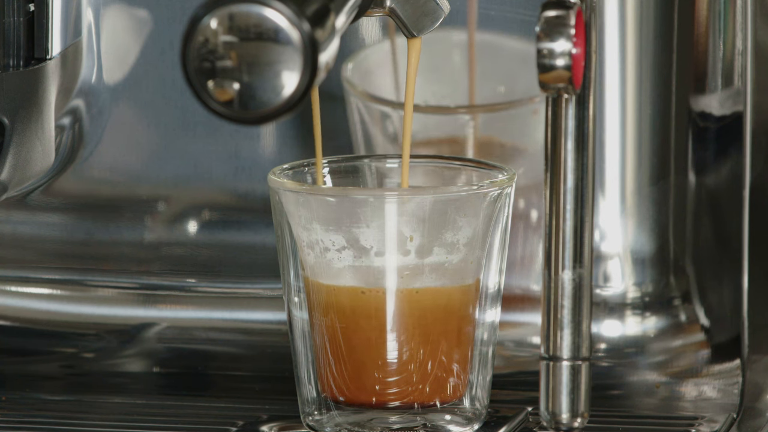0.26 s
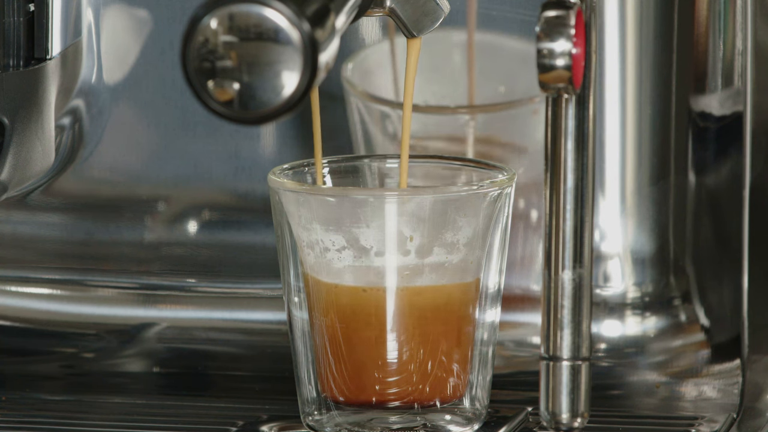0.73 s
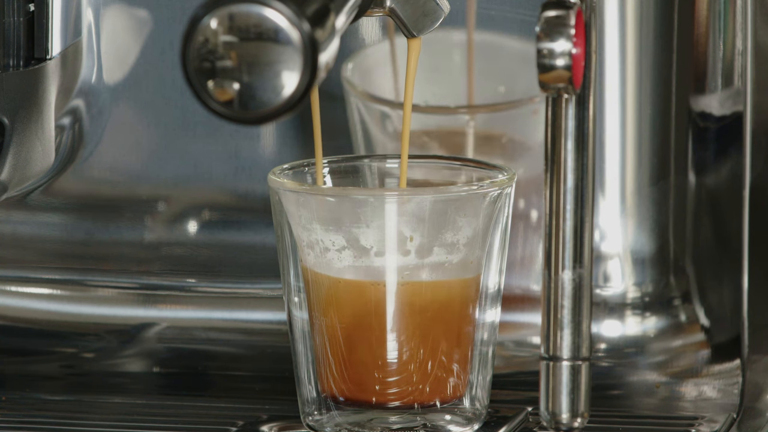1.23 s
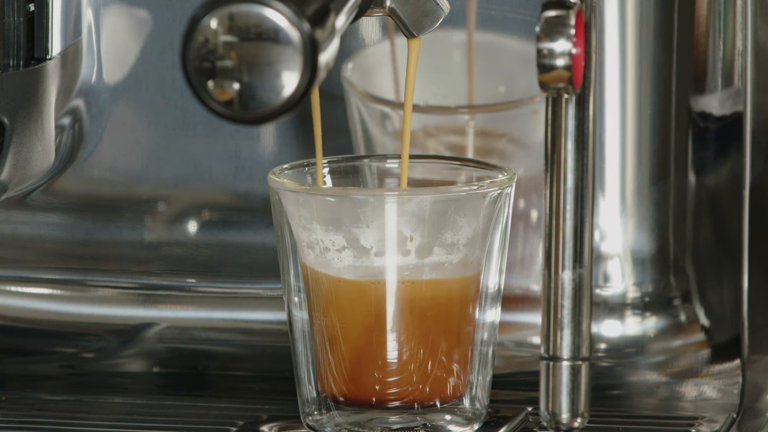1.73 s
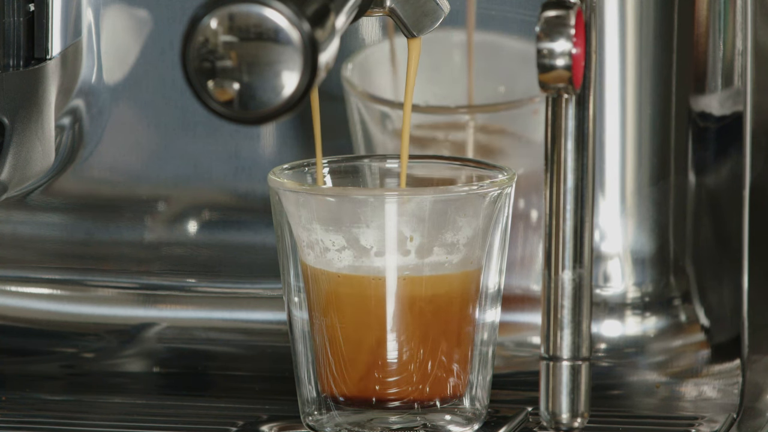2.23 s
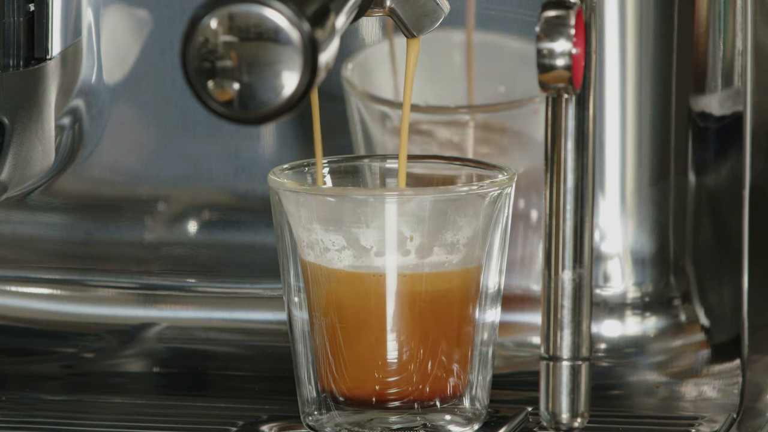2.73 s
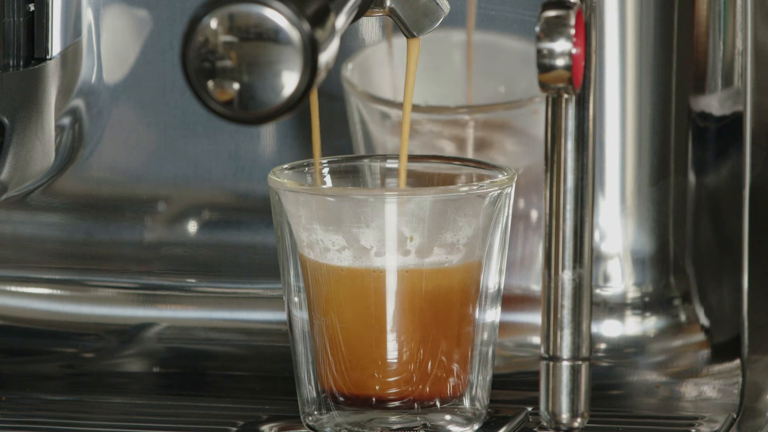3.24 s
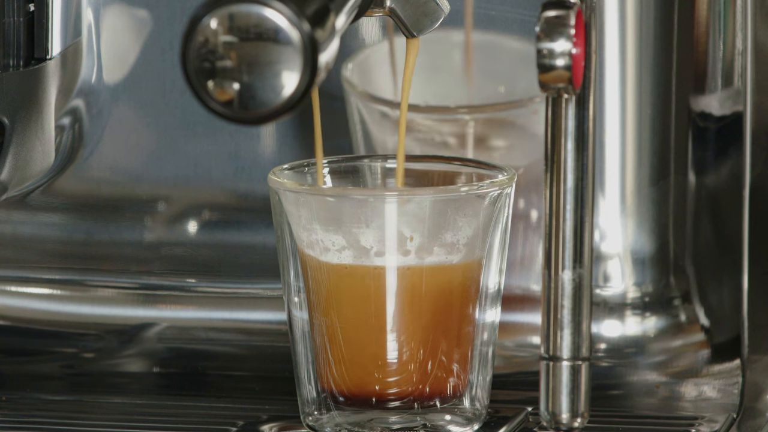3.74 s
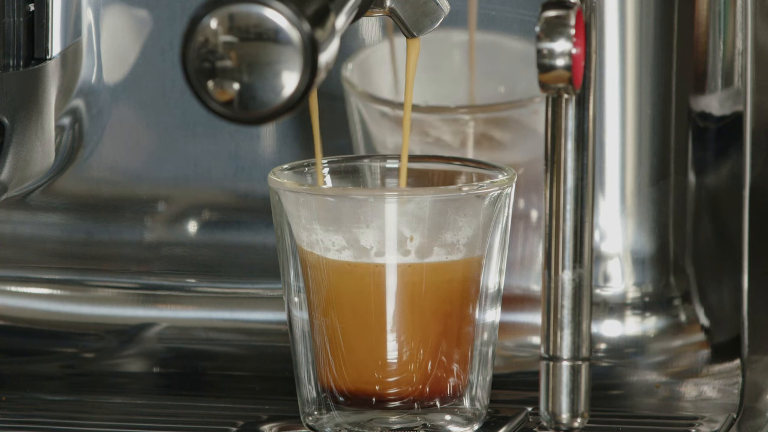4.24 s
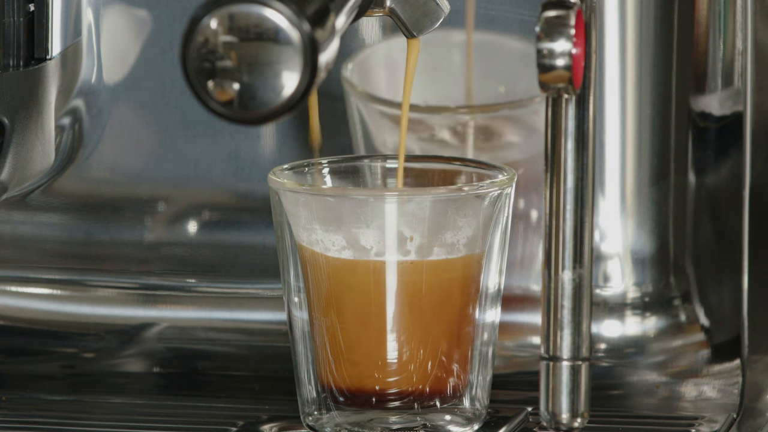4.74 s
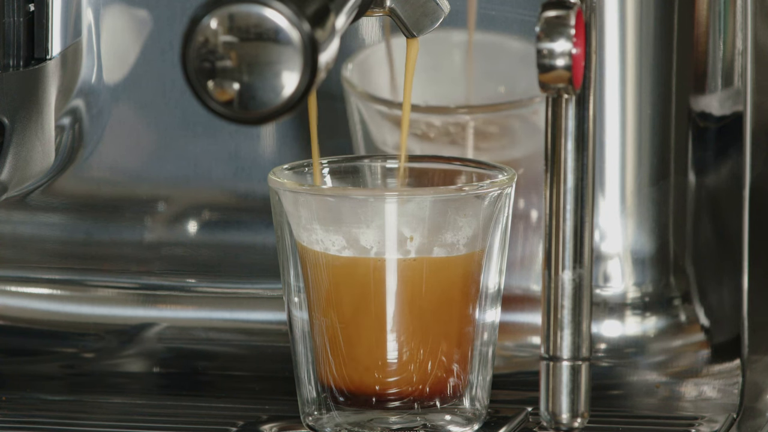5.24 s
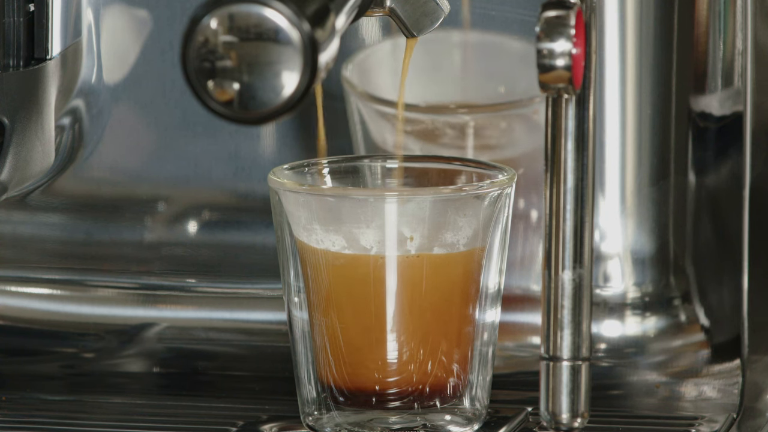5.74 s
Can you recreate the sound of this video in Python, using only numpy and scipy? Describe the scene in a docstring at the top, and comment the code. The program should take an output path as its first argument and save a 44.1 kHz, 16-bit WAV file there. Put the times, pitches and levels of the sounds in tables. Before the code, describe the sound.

Close to a coffee machine in a quiet room, a mains-driven pump buzzes in quick uneven surges over pulsing water noise and faint chattering metal. It then settles to an even, slightly whinier drone. Near the end the power drops, the pump knocks to a halt, a valve releases a short burst of water and air, and sparse droplets spit into near silence.

```python
"""The vibratory pump of an espresso machine hums on mains current while coffee runs into a glass.
The hum is a stack of mains harmonics; whine, rasp, rattle and rushing water follow the same strokes.
Its pressure surges about five times a second, then settles. The pump cuts off with a clunk built of
decaying modes, the valve gushes and spits shaped noise and bubbles, and a quiet room is left."""
import sys
import numpy as np
from scipy import signal
from scipy.fft import rfft, irfft
from scipy.io import wavfile

SR = 44100
rng = np.random.default_rng(int(sys.argv[2]) if len(sys.argv) > 2 else 0)


def store_pcm(level_fs):
    """Save levels as 16-bit WAV."""
    pcm = np.round(np.clip(level_fs, -1, 1) * 32767).astype(np.int16)
    wavfile.write(sys.argv[1], SR, np.atleast_2d(pcm).T)


N = 263277
T = np.arange(N) / SR  # s

MAINS_HZ = 60.001
SETTLE, STOP = 3.216, 5.068  # the pressure steadies, the pump cuts off (s)
RUN_DOWN = .13  # t60 of the pump's sound once the power is off (s)
EDGE_HZ = 15480  # upper band limit


def amp(db):
    """Decibels to gain."""
    return 10 ** (np.asarray(db) / 20)


def evened(x):
    """Scales to rms 1."""
    return x / np.sqrt(np.mean(x ** 2) + 1e-30)


def read(points, hz):
    """Reads a spectrum on a log-frequency axis."""
    f, value = np.transpose(points)
    return np.interp(np.log(hz + 1), np.log(f + 1), value)


def add(mix, s, sound):
    """Mixes a sound in at time s."""
    part = mix[round(s * SR):][:len(sound)]
    part += sound[:len(part)]


def colour(x, spectrum):
    """Gives a white signal of rms 1 a spectrum in dB per Hz."""
    gain = amp(read(spectrum, np.fft.rfftfreq(N, 1 / SR)))
    return irfft(rfft(x) * gain, N) * np.sqrt(SR / 2)


def drift(rate_hz):
    """Slow chance of rms 1."""
    hz = np.fft.rfftfreq(N, 1 / SR)
    return evened(irfft(rfft(rng.standard_normal(N)) * np.exp(-(hz / rate_hz) ** 2), N))


def resonate(x, hz, width):
    """A fixed resonance of gain 1 at its centre."""
    r = np.exp(-np.pi * width / SR)
    pole = r * np.exp(2j * np.pi * hz / SR)
    return 2 * signal.lfilter([1 - r], [1, -pole], x).real


def band(count, hz, width):
    """Noise of rms 1 in a bell-shaped band."""
    f = np.fft.rfftfreq(count, 1 / SR)
    bell = .5 ** (2 * ((f - hz) / width) ** 2)
    return evened(irfft(rfft(rng.standard_normal(count)) * bell, count))


def fade(t, t60):
    """Exponential decay from t = 0, by 60 dB in t60 seconds."""
    return np.exp(-np.log(1000) * np.maximum(t, 0) / t60)


def swell(s, length):
    """A bell-shaped rise and fall around time s, with its length taken at half height."""
    return .5 ** ((2 * (T - s) / length) ** 2)


def drive(lag_ms=0.16, ease=0.21, unequal=0.083):
    """The pump's pressure (about 1 at the top of a surge), how settled it is (0-1), its count of strokes."""
    # The pace of the surges, about five a second. Each row: time in seconds, surges gone by.
    pace = [(-.06, -0.5), (.15, 0), (.53, 2), (1.16, 5), (1.57, 7.5), (1.95, 9), (2.73, 13), (3.17, 15),
            (3.6, 16)]
    surge_s, shortens_s_per_s = 0.083, .012  # length at the start, and how fast the surges grow crisper
    steady_pressure = .3  # where the pressure rests once settled, as a share of a surge

    beat = np.interp(T, *np.transpose(pace))
    from_top_s = (beat - np.round(beat)) / np.maximum(np.gradient(beat, T), 1)
    length = np.maximum(surge_s - shortens_s_per_s * T, 1 / MAINS_HZ)
    surge = .5 ** ((2 * from_top_s / length) ** 2) * (1 + unequal * drift(1.3))

    settled = np.clip((T - SETTLE) / ease + .5, 0, 1)
    pressure = surge + (steady_pressure - surge) * settled
    # the piston lags a little whenever the pressure rises
    strokes = MAINS_HZ * (T - lag_ms / 1000 * pressure)
    return pressure, settled, strokes


def hum(pressure, settled, strokes, level_db=-48.5, flutter=0.078, calm_flutter=0.05, flutter_hz=14,
        firm_db=-11, swing_turns=0.16, swing_db=8, calm_db=-1.5, calm_above_hz=700):
    """Mains harmonics shift with the pressure; weak ones flutter most, upper ones soften once it settles."""
    # The lines of the hum. Each row: multiple of the mains, level in dB relative to level_db.
    lines = [(1, -19), (2, -4.5), (3, -31.5), (4, -21), (5, -20.5), (6, -15.5), (7, -12.5), (8, 0.5),
             (9, -24), (10, -18.5), (11, -27.5), (12, -36.5), (13, -29), (14, -28.5), (15, -36.5),
             (16, -43), (17, -34), (18, -32), (19, -27), (20, -35), (21, -39), (22, -29.5), (23, -41),
             (24, -34.5), (25, -36), (26, -41.5)]
    # The lines that answer the pressure. Each row: multiple of the mains, gain in dB as the pressure reaches 1.
    answers = [(1, 3.5), (2, 2), (3, 10.5), (4, 2), (5, -12.5), (6, -3.5), (7, 0), (8, -2), (10, -4.5),
               (13, 13.5), (14, -15.5), (16, 7.5), (18, 6.5), (22, 3), (24, -4)]
    swings = {round(order): db for order, db in answers}

    out = np.zeros(N)
    unrest = flutter + (calm_flutter - flutter) * settled
    for order, db in lines:
        order = round(order)
        swing = swings.get(order, 0)
        soften = calm_db * (settled - .5) * (order * MAINS_HZ > calm_above_hz)
        level = evened(1 + (amp(swing) - 1) * pressure) * amp(db + soften)
        shake = unrest / (1 + amp(db - firm_db))
        # lines that change most in level also bend most in pitch: flat as a surge comes, sharp as it goes
        bend = swing_turns * np.tanh((swing / swing_db) ** 2) * pressure
        turns = order * strokes - bend + rng.random()
        fluttering_level = level * (1 + shake * drift(flutter_hz))
        out += fluttering_level * np.cos(2 * np.pi * turns + shake * drift(flutter_hz))
    return amp(level_db) * np.sqrt(2) * out


def uneven(pressure, settled, strokes, count=45, wander=.55, calm_wander=1.0, wander_hz=9, weave_turns=.3):
    """Strong and weak strokes alternate: lines halfway between harmonics, woven by each surge."""
    # Lines between the main ones. Each row: frequency in Hz, rms level of a line in dB.
    between = [(30, -86), (150, -84), (270, -76.5), (330, -73), (450, -79.5), (510, -70), (630, -87.5),
               (750, -84.5), (930, -95), (1400, -91.5), (2500, -113.5), (4000, -106)]
    out = np.zeros(N)
    looseness = wander + (calm_wander - wander) * settled  # radians
    for order in np.arange(count) + .5:
        turns = order * strokes - weave_turns * pressure + rng.random()
        line = np.cos(2 * np.pi * turns + looseness * drift(wander_hz))
        out += amp(read(between, order * MAINS_HZ)) * line
    return np.sqrt(2) * out


def whine(settled, strokes, settled_db=2.0, strike=.17, flutter=0.11, flutter_hz=14):
    """A thin metallic whine from the casing, in step with the piston's strike; it comes forward later."""
    # High harmonics that the casing singles out. Each row: multiple of the mains, dB before the pump settles.
    high_lines = [(29, -88.5), (36, -92), (42, -88.5), (43, -90)]
    out = np.zeros(N)
    for order, db in high_lines:
        line = np.cos(2 * np.pi * round(order) * (strokes - strike))
        out += amp(db) * (1 + flutter * drift(flutter_hz)) * line
    return np.sqrt(2) * out * amp(settled_db * settled)


def buzz(settled, strokes, ring=0.026, scatter_db=1.3, surging_db=-2.0):
    """Each stroke strikes the casing, which smears the blow into a short rasp: a comb of fine lines."""
    # Tone of the struck casing. Each row: frequency in Hz, dB per Hz before the cut on return.
    casing = [(1450, -140), (1650, -112), (2000, -111), (2330, -111), (2430, -119), (2630, -110),
              (2870, -110), (3150, -125), (3450, -122), (3720, -112), (4000, -123), (5700, -119),
              (7000, -130), (15000, -148)]
    t = T[:round(SR / MAINS_HZ)]
    burst = rng.standard_normal(len(t)) * fade(t, ring)
    # keep only the phases, so the rasp itself has a flat spectrum
    rasp = irfft(np.exp(1j * np.angle(rfft(burst))), len(t))
    blows = np.diff(np.floor(strokes), prepend=0).clip(0, 1) * amp(scatter_db * rng.standard_normal(N))
    rung = signal.oaconvolve(blows, rasp)[:N]
    # cut twice over while surging, once when settled
    return colour(evened(rung), casing) * amp(surging_db * (2.0 - settled))


def rattle(strokes, level_db=-87, per_s=1100, spread_db=4.5, ring=0.013, after_stroke=0.3):
    """Loose fittings chatter, mostly just after each stroke, now and then with a sharper tick."""
    # Thin metal parts that the strokes shake. Each row: frequency in Hz, width in Hz, relative level in dB.
    fittings = [(2530, 220, 5), (2640, 150, -2.5), (3700, 250, 4), (4540, 270, -4.5), (5770, 700, -12),
                (7790, 200, -1), (8800, 170, 0)]
    # The sharpest ticks. Each row: start in seconds, peak level in dB.
    ticks = [(0.958, -64), (1.119, -69), (1.635, -68), (3.159, -66), (3.253, -65), (3.619, -68),
             (3.928, -62)]

    def metal(x):
        """The fittings ring side by side."""
        return sum(amp(db) * resonate(x, hz, width) for hz, width, db in fittings)

    chance = per_s / SR * np.exp(-(strokes % 1) / after_stroke)  # per sample
    force = amp(spread_db * np.minimum(rng.exponential(1, N), 3))
    taps = (rng.random(N) < chance) * force * rng.choice([-1, 1], N)
    out = amp(level_db) * evened(metal(taps))
    t = T[:SR // 10]
    for s, db in ticks:
        tick = metal(rng.standard_normal(len(t)) * fade(t, ring))
        add(out, s, amp(db) * tick / abs(tick).max())
    return out


def rush(settled, strokes, pulse_db=3, surging_db=5, swirl_db=1, level_db=-2.0, churn_hz=2600):
    """Water is pushed in spurts, one a stroke; its lower band churns more until the pressure settles."""
    # Water rushing through the pump. Each row: frequency in Hz, dB per Hz before level_db and churn.
    water_tone = [(30, -120), (62, -91), (100, -99), (210, -97), (300, -97), (490, -97), (700, -106),
                  (1100, -108), (1700, -116), (2700, -118), (3200, -126), (4600, -123), (7000, -128),
                  (15000, -138)]
    spurts = amp(pulse_db * np.cos(2 * np.pi * (strokes - .2)) + swirl_db * drift(9.2))
    flow = amp(level_db) * colour(evened(rng.standard_normal(N) * spurts), water_tone)
    lowpass = signal.butter(2, churn_hz, fs=SR, output="sos")
    churn = signal.sosfiltfilt(lowpass, flow)
    return flow + churn * (amp(surging_db) - 1) * (1 - settled)


def clunk(rise=0.0046, thud_hz=620, thud_width_hz=520, thud_t60=0.13, rough=0.44, rough_hz=70):
    """The piston halts, the frame thuds and rings, and a low, rough note sags away."""
    # Knocks as the pump stops and the valve seats.
    # Each row: start in seconds, level in dB, pitch in Hz, t60 in seconds, dull thud beside the ring in dB.
    knocks = [(5.065, -47, 548, 0.056, -16), (5.181, -64.5, 745, 0.085, 0), (5.186, -71, 604, 0.08, -4)]
    # The frame that rings with a knock. Each row: factor on the knock's pitch, relative level in dB.
    frame = [(1, 8.5), (0.64, -0.5), (4, -22), (2.8, -16)]
    # The low note as the pressure falls. Each row: time in seconds, pitch in Hz, level in dB.
    sag = [(5.072, 135, -50), (5.094, 226, -54), (5.123, 227, -55), (5.145, 215, -66), (5.168, 172, -63.5),
           (5.21, 80, -72)]

    out = np.zeros(N)
    t = T[:SR // 3]
    for s, db, hz, t60, thud_db in knocks:
        modes = sum(amp(mode_db) * np.sin(2 * np.pi * hz * factor * t) for factor, mode_db in frame)
        ring = modes * fade(t - rise, t60)
        thud = amp(thud_db) * band(len(t), thud_hz, thud_width_hz) * fade(t - rise, thud_t60)
        add(out, s, amp(db) * (ring + thud) * np.minimum(t / rise, 1))

    s, hz, db = np.transpose(sag)
    phase = 2 * np.pi * np.cumsum(np.interp(T, s, hz)) / SR + rough * drift(rough_hz)
    note = np.sin(phase) * (1 + rough * drift(rough_hz))
    return out + note * amp(np.interp(T, s, db)) * (T > s[0]) * (T < s[-1])


def vent(delay_s=0.049, length=0.13):
    """The pressure escapes through the valve in one short gush of noise just after the pump stops."""
    # Tone of the gush at its height. Each row: frequency in Hz, dB per Hz.
    gush = [(200, -105), (480, -86), (1100, -103), (2200, -109), (4000, -118), (8000, -122), (15000, -127)]
    return swell(STOP + delay_s, length) * colour(rng.standard_normal(N), gush)


def spits(width_hz=750, splash_db=-8.0, splash_hz=4900, splash_width_hz=3600, tail_db=-25, tail=0.38,
          rise=0.0011, t60=0.022, bubble_db=-4, puff_db=-2.0, climb=.13, climb_s=0.0054):
    """Water and air burst through the valve: a bubble rising in pitch, a puff, a splash, a little room."""
    # The valve's spits. Each row: start in seconds, level in dB, pitch in Hz.
    bursts = [(5.0672, -62.5, 2780), (5.070, -72, 8670), (5.0854, -62, 3570), (5.103, -73, 9040),
              (5.105, -53, 3780), (5.109, -61, 2140), (5.114, -62, 5560), (5.119, -60, 4620),
              (5.1426, -55.5, 4270), (5.1435, -76, 6770), (5.1497, -64, 5450), (5.191, -70, 2760),
              (5.2398, -65, 3820), (5.3237, -69, 3570), (5.328, -76, 4860), (5.4445, -76, 4520)]
    out = np.zeros(N)
    t = T[:SR // 4]
    for s, db, hz in bursts:
        turns = hz * np.cumsum(1 + climb * (1 - np.exp(-t / climb_s))) / SR
        bubble = amp(bubble_db) * np.sqrt(2) * np.sin(2 * np.pi * turns)
        puff = amp(puff_db) * band(len(t), hz, width_hz)
        splash = amp(splash_db) * band(len(t), splash_hz, splash_width_hz)
        spray = puff + splash
        spit = fade(t - rise, t60) * (bubble + spray) + amp(tail_db) * fade(t, tail) * spray
        add(out, s, amp(db) * np.minimum(t / rise, 1) * spit)
    return out


def hisses():
    """Soft swells of noise, each in its own band."""
    # Each row: middle in seconds, level in dB, length in seconds, centre in Hz, width in Hz.
    swells = [(0.89, -81, .016, 12000, 4000), (0.955, -89, 0.05, 11500, 4000),
              (0.958, -63.5, 0.018, 1180, 704), (1.06, -85, 0.33, 3440, 380), (1.303, -83, 0.21, 3300, 230),
              (3.954, -81, 0.23, 10000, 6950)]
    return sum(amp(db) * swell(s, length) * band(N, hz, width) for s, db, length, hz, width in swells)


def rumble(at_s=2.197, length=0.22, level_db=-62.0, hz=66, width_hz=17):
    """A low rumble of narrow-band noise swells briefly under the hum."""
    return amp(level_db) * swell(at_s, length) * band(N, hz, width_hz)


def room():
    """The quiet room: steady noise with a fixed spectrum."""
    # Tone of the room. Each row: frequency in Hz, dB per Hz.
    room_tone = [(20, -116), (30, -100), (45, -89), (115, -89), (200, -93.5), (330, -100), (430, -94.5),
                 (650, -108), (1000, -111), (2100, -121), (2800, -117), (3400, -123), (8000, -127),
                 (15000, -130)]
    return colour(rng.standard_normal(N), room_tone)


def scene(drain=1.0):
    """The running pump, its stop, and the room; the water fades with a t60 of drain seconds."""
    pressure, settled, strokes = drive()
    pump = hum(pressure, settled, strokes) + uneven(pressure, settled, strokes)
    pump += whine(settled, strokes) + buzz(settled, strokes) + rattle(strokes)
    running = pump * fade(T - STOP, RUN_DOWN)
    water = rush(settled, strokes) * fade(T - STOP, drain)
    stop = clunk() + vent() + spits()
    return (running + water + stop + hisses() + rumble() + room())[None]


def record(dry):
    """The band limit: a steep linear-phase low-pass."""
    lowpass = signal.firwin(511, EDGE_HZ, window=("kaiser", 9), fs=SR)
    return signal.oaconvolve(dry, lowpass[None], "same")


dry = scene()
out = record(dry)
store_pcm(out)
```